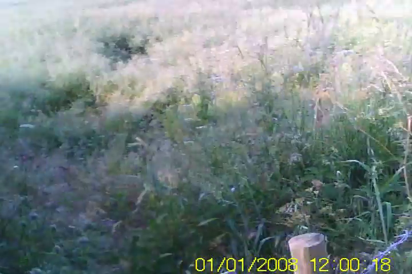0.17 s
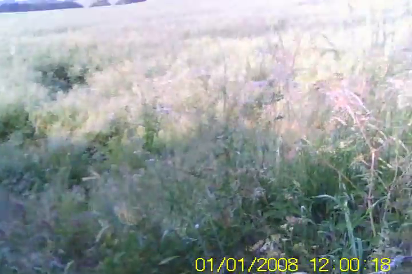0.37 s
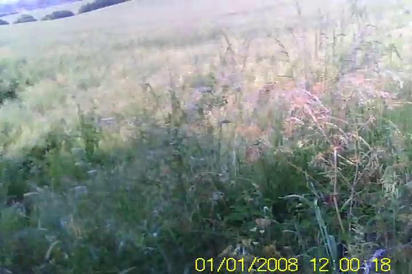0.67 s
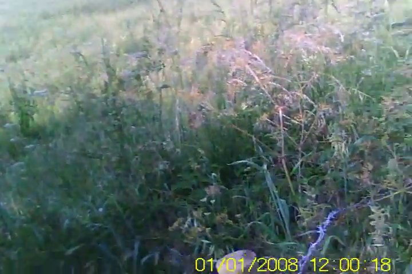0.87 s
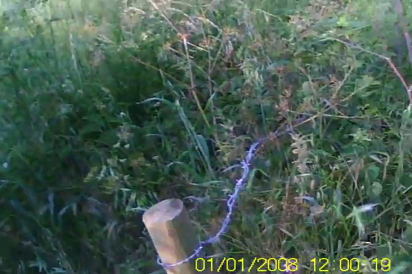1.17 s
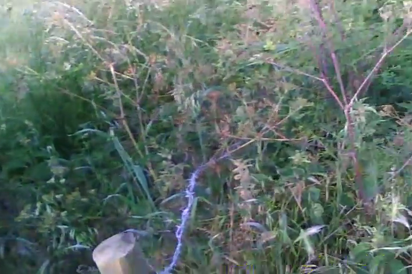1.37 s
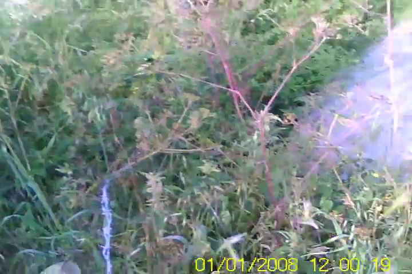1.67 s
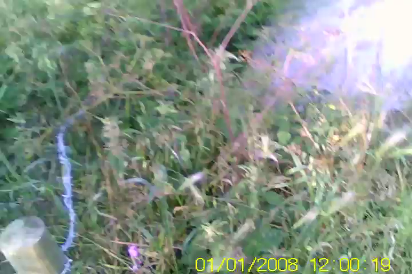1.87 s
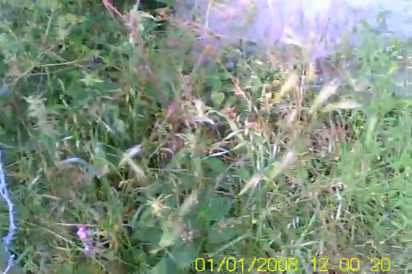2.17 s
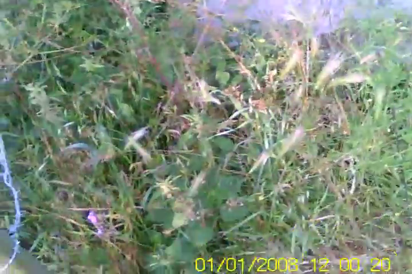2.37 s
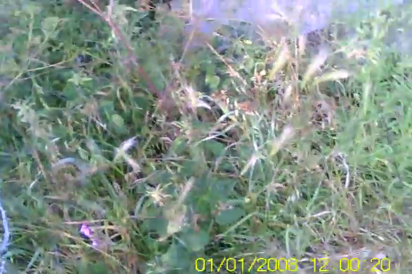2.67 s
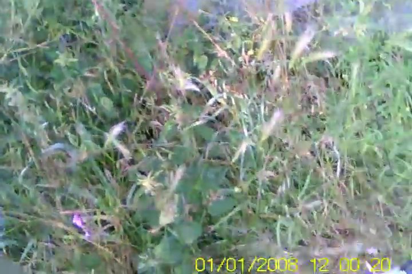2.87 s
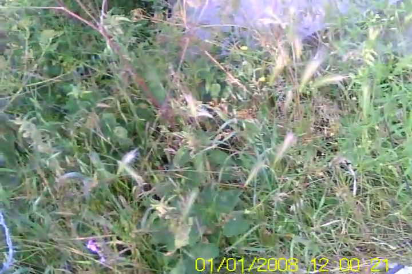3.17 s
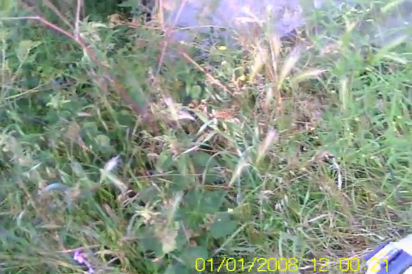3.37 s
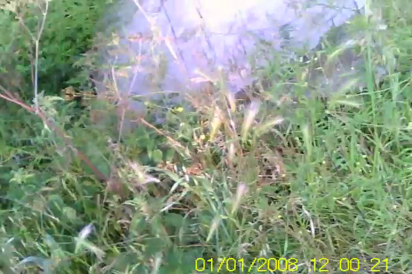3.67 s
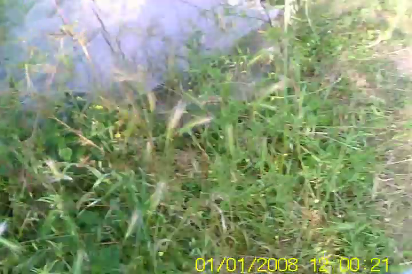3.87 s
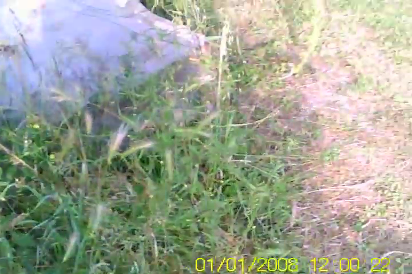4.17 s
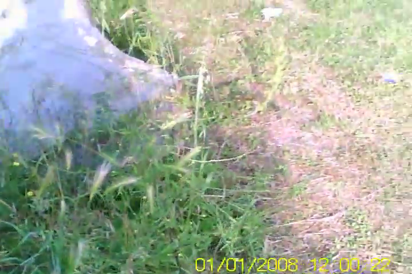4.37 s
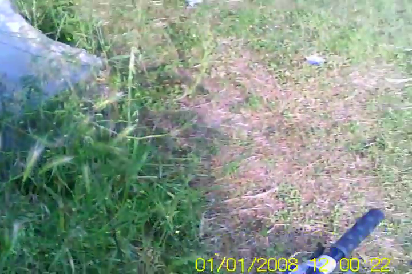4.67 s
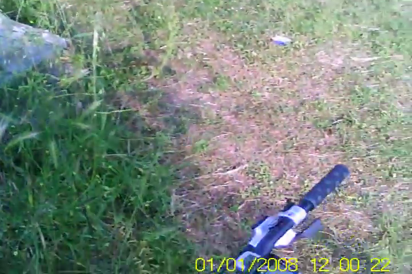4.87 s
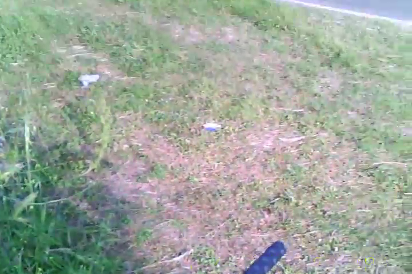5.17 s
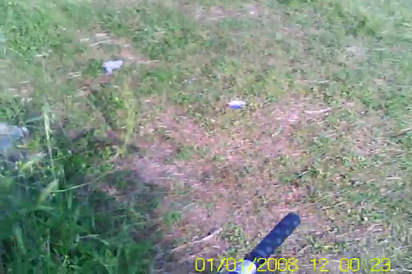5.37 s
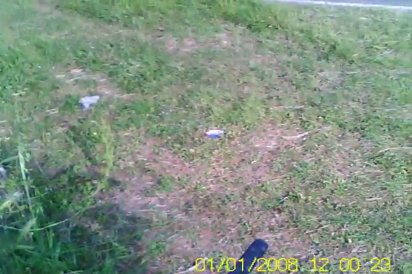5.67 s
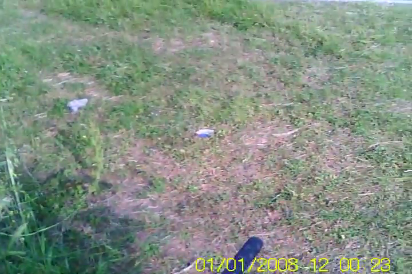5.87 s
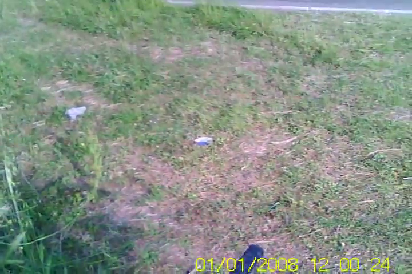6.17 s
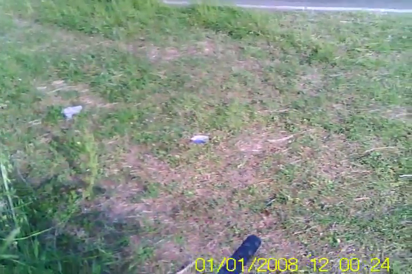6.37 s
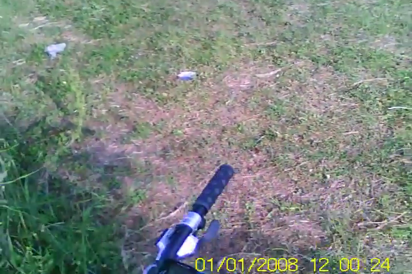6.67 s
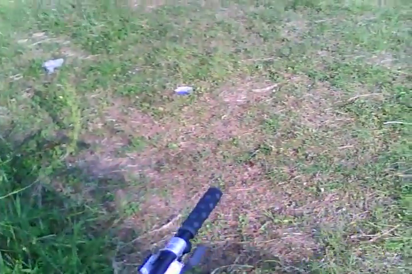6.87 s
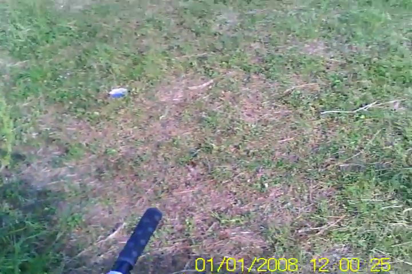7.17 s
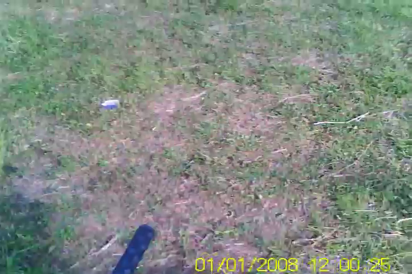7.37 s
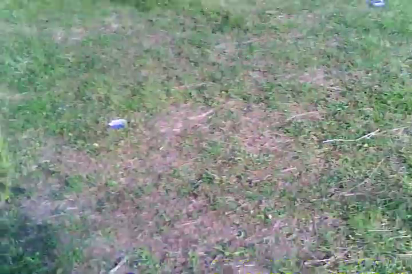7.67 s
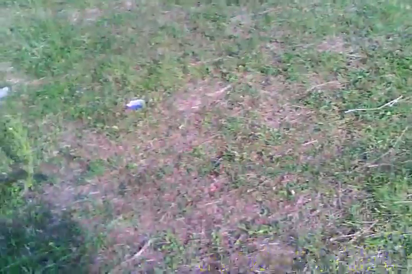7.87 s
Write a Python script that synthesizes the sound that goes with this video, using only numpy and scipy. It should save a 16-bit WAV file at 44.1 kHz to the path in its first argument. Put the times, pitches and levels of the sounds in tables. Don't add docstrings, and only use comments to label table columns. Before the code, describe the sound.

Sharp snaps and soft taps of stems on a bike, steady rustling, a continuous fluttering low rumble, and distant birds chirping outdoors.

```python
import sys
import numpy as np
from scipy import signal
from scipy.io import wavfile
from scipy.ndimage import uniform_filter1d

SR = 44100
rng = np.random.default_rng(int(sys.argv[2]) if len(sys.argv) > 2 else 0)


def output_pcm(signal):
    pcm = np.clip(np.atleast_2d(signal).T, -1, 1) * 32767
    wavfile.write(sys.argv[1], SR, np.round(pcm).astype(np.int16))


def boost_factor(decibels):
    exponent = np.asarray(decibels, float) / 20
    return 10 ** exponent


N = 354167

# frequency [Hz], level [dB].
HISS_SPECTRUM = [(88, -39), (150, -4), (198, -7), (251, -9.5), (349, -11.5), (573, -21.5), (652, -16.5),
                 (741, -21), (1660, -31), (2110, -28), (9350, -32.5), (10400, -35.5), (12100, -47),
                 (15700, -86), (22000, -120)]
# frequency [Hz], level [dB].
CLOCK_LINES = [(3892, -81), (5599, -82.5), (6202, -96.5), (7402, -86), (8301, -98), (9598, -87)]
# time [s], level [dB], frequency [Hz].
FALLING_NOTES = [(0.0907, -54.5, 3320), (0.1979, -64, 3090), (0.301, -59, 3250), (2.4603, -59, 3250),
                 (2.5681, -63, 3230), (2.6643, -61, 3280), (2.769, -60, 3300), (2.8818, -62, 3170),
                 (2.9916, -63, 3300), (3.106, -60.5, 3250), (3.2161, -62, 3010), (4.8908, -57, 3210),
                 (4.9876, -57.5, 3200), (5.0966, -56, 3260), (5.2051, -55, 3220), (5.3073, -57, 3220),
                 (5.416, -57.5, 3140), (7.2789, -55, 3300), (7.3806, -55, 3230), (7.4809, -55, 3050),
                 (7.5915, -56, 3210), (7.697, -57, 3070), (7.8191, -60, 3180)]
# time [s], level [dB], frequency [Hz].
RISING_NOTES = [(2.5406, -69, 4370), (2.6494, -70, 4370), (2.9627, -66, 4210), (3.0714, -67, 4210),
                (3.1994, -66, 4240), (4.8638, -68, 4360), (4.75, -64, 4250), (4.9694, -69, 4270),
                (5.0694, -66, 4320), (5.2819, -65, 4180), (5.3867, -67, 4330), (7.8032, -67, 4480)]
# time [s], level [dB], frequency [Hz].
LEVEL_NOTES = [(3.3794, -67, 4730), (3.5894, -68, 4760), (3.7419, -65, 5030), (3.8894, -66, 5010),
               (4.0911, -64, 5000), (4.2602, -63, 5000)]
# start [s], length [s], starting frequency [Hz], level [dB].
SLURS = [(1.15, .24, 3227, -63), (2.056, 0.22, 3280, -62), (4.536, .235, 3220, -66.5),
         (6.788, 0.21, 3180, -66)]
# start [s], length [s], from [Hz], to [Hz], level [dB].
GLIDES = [(.243, 0.019, 6520, 5140, -56), (.345, .027, 4050, 3880, -67), (.39, .045, 5400, 5300, -70),
          (.435, .095, 5130, 4650, -70), (.57, .05, 5520, 5330, -70), (.63, .068, 3400, 3730, -62),
          (.698, .012, 3650, 3250, -62), (.71, 0.037, 3300, 3600, -61), (.925, 0.029, 3550, 2600, -65),
          (.878, .022, 8400, 8500, -65), (.968, .014, 2600, 2850, -63), (1.04, .02, 3300, 3700, -61),
          (1.06, .014, 3620, 3400, -63), (1.078, .014, 3280, 3500, -60), (1.93, .07, 2720, 2750, -72),
          (2.17, .16, 1850, 1793, -69), (6.638, 0.025, 6350, 4920, -56), (6.732, .03, 4300, 3800, -60.5),
          (7.025, 0.07, 3330, 3750, -59.5), (7.09, .028, 3750, 3020, -59.5),
          (7.175, 0.082, 2120, 1980, -66.5), (6.925, .075, 1670, 1660, -67), (7.38, .045, 1700, 1690, -70),
          (7.175, .04, 3300, 3100, -68), (1.11, .03, 3550, 3480, -67), (6.87, .06, 4750, 4200, -70),
          (.755, 0.027, 3700, 3600, -66), (.79, .03, 3400, 3900, -71)]
# start [s], length [s], from [Hz], to [Hz], level [dB].
TRILLS = [(.175, 0.063, 5600, 6500, -61.5), (.435, 0.037, 5950, 6150, -63), (.7, .08, 3200, 3000, -70),
          (.915, 0.08, 3400, 3370, -66), (1.095, 0.063, 3180, 3250, -62.5),
          (6.53, 0.094, 4080, 6400, -64.5), (6.665, 0.067, 5900, 5620, -69), (6.82, 0.048, 6300, 5500, -66),
          (6.855, .075, 4950, 4250, -67), (6.925, .085, 4250, 3950, -67), (7.118, .057, 3450, 3750, -65)]
# frequency [Hz], width [Hz], level [dB].
REGULATOR_MODES = [(60, 38, -8), (122, 14, 6.5), (194.6, 22.5, 7.5)]
# time [s], level [dB].
PUSH_EFFORT = [(0.0, -61), (0.18, -59.5), (0.51, -62), (0.85, -59), (1.25, -63), (1.61, -59.5), (2.06, -59),
               (2.7, -59.5), (2.97, -63.5), (3.69, -60), (4.3, -64), (4.7, -57.5), (5.03, -63), (6.11, -64),
               (6.66, -57), (6.98, -62.5), (7.45, -59.5), (8.03, -66)]
# frequency [Hz], level [dB].
BRUSH_SPECTRUM = [(250, -16), (500, -3), (1000, -1.5), (1600, -2), (2000, -7.5), (2600, -14), (4000, -16),
                  (8000, -25)]
# middle [s], length [s], body [dB], swish [dB].
STROKES = [(0.166, 0.11, -60, -73), (0.76, 0.18, -60.5, -83), (1.514, 0.077, -56, -75),
           (1.86, 0.22, -59, -87), (2.25, 0.16, -71, -83), (2.744, 0.045, -45.5, -61),
           (2.783, 0.05, -60, -82), (3.74, 0.12, -59, -78), (4.637, 0.14, -63, -65),
           (4.738, 0.19, -56.5, -62), (4.988, 0.21, -63, -83), (6.464, 0.049, -53, -73),
           (6.617, 0.23, -65, -83), (6.898, 0.33, -62, -81), (7.53, .2, -69, -89)]
# frequency [Hz], level [dB].
STROKE_SPECTRUM = [(250, -30), (500, -1), (1000, -3.5), (1600, 1.5), (2000, -5.5), (2600, -8),
                   (4000, -14.5), (8000, -54)]
# frequency [Hz], width [Hz], level [dB].
SWISH_MODES = [(8300, 1000, 0.5), (6300, 790, -7), (9800, 830, -12), (3400, 880, -4)]
# frequency [Hz], width [Hz], level [dB].
SNAP_MODES = [
    (1600, 600, 3),
    (1050, 500, -14),
    (2350, 600, -10),
    (3200, 700, -10),
    (4400, 1200, -17),
]
# frequency [Hz], width [Hz], level [dB].
PORT_MODES = [(6300, 460, 1.5), (8400, 1100, 4), (9800, 900, -12), (4470, 680, -6)]
# frequency [Hz], width [Hz], level [dB].
TUBE_MODES = [(360, 68, -7), (477, 73, -3), (600, 110, -3), (760, 100, -7.5), (884, 60, -1.5),
              (1150, 47, -18)]
# time [s], snap [dB], tube frequency [Hz], knock [dB], airy tick [dB].
BLOWS = [(0.7097, -40, 506, -48, -53), (0.7247, -46, 447, -56, -52), (0.7433, -39.5, 778, -46, -34.5),
         (0.7842, -34.5, 441, -47, -43.5), (1.4707, -33, 760, -33, -57), (1.4962, -38, 730, -31, -46),
         (1.508, -30, 690, -40, -27), (1.5149, -35, 1180, -38, -41), (1.5681, -34, 528, -44, -60),
         (2.0919, -32, 490, -38, -52), (2.1044, -49, 1000, -36.5, -63), (2.7349, -53, 541, -33.5, -45),
         (2.7413, -33.5, 610, -40, -40.5), (2.751, -41, 470, -33.5, -46), (2.7594, -50, 522, -40, -50),
         (3.3544, -32.5, 398, -46, -47), (3.6403, -36, 500, -37, -42), (3.7898, -59, 404, -54, -44)]
# time [s], snap [dB], snap frequency [Hz], knock [dB].
TAPS = [(0.841, -51, 1660, -44), (0.9505, -44, 1590, -51), (1.5457, -29, 1525, -41),
        (1.8617, -58, 1600, -44.5), (1.9799, -52, 1450, -42.5), (2.7255, -44, 1850, -52),
        (2.848, -46, 1390, -38), (2.86, -52, 2300, -40), (2.8815, -45, 1800, -45), (3.4433, -43, 1660, -50),
        (3.7149, -50, 1350, -50), (4.0168, -42, 1630, -45), (4.4115, -37, 1590, -45),
        (4.8355, -37, 1670, -37), (4.9096, -45, 1400, -50), (5.1104, -53, 1500, -60),
        (6.4507, -43, 1600, -48), (6.4631, -45, 1830, -48), (7.4993, -60, 1400, -37.5),
        (7.7328, -46, 1340, -59), (3.557, -49, 1600, -60), (3.6345, -46, 1150, -58),
        (3.7205, -48, 1550, -56), (4.607, -50, 1500, -58), (4.637, -49, 1650, -60), (2.765, -46, 1400, -52),
        (1.5735, -43, 1400, -48)]
# time [s], level [dB], frequency [Hz], width [Hz].
IMPACT_RINGS = [(1.471, -19.5, 194.4, 21.6), (1.471, -17.5, 950, 75), (1.495, -22, 190, 29),
                (1.4955, -22.5, 388, 55), (1.4711, -21.5, 467, 85), (2.091, -30.5, 228, 41),
                (2.846, -31, 132, 5.7), (2.848, -34, 230, 28), (2.862, -36.5, 605, 47),
                (2.862, -36, 530, 36), (2.866, -35.5, 242, 17), (2.868, -40.5, 130, 5.8),
                (2.868, -38.5, 450, 13.6), (2.863, -45, 1700, 64), (2.734, -35, 510, 32),
                (2.735, -33.5, 1370, 91), (3.6408, -20.5, 890, 170), (3.642, -31, 1700, 120),
                (3.646, -29, 530, 50), (3.715, -32, 242, 47), (7.499, -29, 228, 38), (7.499, -35.5, 486, 60),
                (0.841, -37, 990, 150), (1.9, -36, 1740, 120), (2.742, -36.5, 830, 60),
                (1.509, -32, 2940, 200), (6.45, -46, 1830, 120), (4.836, -36, 2030, 200),
                (4.91, -46, 960, 230), (1.497, -27, 1050, 89),
                (.7097, -43, 1330, 130), (.7433, -45, 813, 90), (.7842, -46, 1114, 150),
              (1.471, -29.5, 1560, 89), (1.496, -32, 1513, 100), (1.496, -26, 597, 66),
              (1.508, -32, 1176, 42), (1.512, -38, 1420, 60), (1.513, -33, 1810, 60),
              (1.569, -32, 1950, 250), (1.5685, -34, 1270, 200), (1.5685, -34, 528, 140),
              (1.98, -41, 1066, 130), (2.092, -32.5, 720, 120), (2.741, -33, 1846, 96),
              (2.751, -40, 1421, 70), (2.751, -42, 495, 50), (2.848, -40, 603, 150), (2.89, -44, 460, 20),
              (3.6401, -23, 415, 110), (2.0915, -33, 490, 85), (2.104, -42, 1000, 90),
              (2.092, -33, 1000, 200), (2.731, -42, 700, 150), (4.836, -42, 1270, 200),
              (7.499, -41, 985, 120)]


def evened(x):
    return x / np.sqrt(np.mean(x ** 2) + 1e-20)


def add(mix, s, sound):
    part = mix[round(s * SR):][:len(sound)]
    part += sound[:len(part)]


def smooth(x, seconds):
    r = np.exp(-1 / (seconds * SR))
    return signal.lfilter([1 - r], [1, -r], x)


def band(x, lo_hz, hi_hz):
    return signal.sosfilt(signal.butter(3, [lo_hz, hi_hz], "bandpass", fs=SR, output="sos"), x)


def ring(x, modes):
    out = np.zeros(x.shape)
    for hz, width, db in modes:
        r = np.exp(-np.pi * width / SR)
        pole = r * np.exp(2j * np.pi * hz / SR)
        out += boost_factor(db) * signal.lfilter([1 - r], [1, -pole], x).real
    return out


def noise(spectrum, patchy_db):
    bin_hz = np.fft.rfftfreq(512, 1 / SR)
    real, imag, patches = rng.standard_normal((N // 128 + 5, 257, 3)).T
    patches = uniform_filter1d(patches, 6, 0)
    patches = evened(uniform_filter1d(patches, 12, 1))
    hz, db = np.transpose(spectrum)
    shape_db = np.interp(np.log(bin_hz + 1), np.log(hz), db)
    spectra = (real + 1j * imag) * boost_factor(shape_db[:, None] + patchy_db * patches)
    return evened(signal.istft(spectra, nperseg=512, noverlap=384)[1][:N])


def amplifier():
    t = np.arange(N) / SR
    wander = smooth(smooth(rng.standard_normal(N), 0.052), 0.017)
    drift = 0.12 * evened(wander)
    lines = np.zeros(N)
    for hz, db in CLOCK_LINES:
        turns = hz * t + drift * hz / 4000 + rng.random()
        lines += boost_factor(db) * np.sqrt(2) * np.sin(2 * np.pi * turns)
    return boost_factor(-56) * noise(HISS_SPECTRUM, 1.0) + lines


def tone(hz, db, taper):
    waver, flutter = (evened(smooth(smooth(z, 0.0025), 0.0019)) for z in rng.standard_normal((2, len(hz))))
    phase = 2 * np.pi * np.cumsum(hz * (1 + 0.0066 * waver)) / SR
    level = boost_factor(db + 1.8 * flutter) * np.sqrt(2)
    return level * np.sin(phase) * signal.windows.tukey(len(hz), taper)


def birds():
    far, near = np.zeros((2, N))
    warble_hz = 88
    dips = 0.6 - 2 * np.sin(np.pi * warble_hz * np.arange(SR) / SR) ** 4

    for s, length, hz, db in SLURS:
        u = np.linspace(0, 1, round(length * SR))
        rise = 0.24 * np.sin(np.pi / 2 * u) ** 1.05
        warble = 0.055 * u ** 0.58 * dips[:len(u)]
        add(far, s, tone(hz * (1 + rise + warble), db - 8 * u, 0.21))

    for rows, depth in ((GLIDES, 0), (TRILLS, 0.0347)):
        for s, length, from_hz, to_hz, db in rows:
            u = np.linspace(0, 1, round(length * SR))
            hz = from_hz + (to_hz - from_hz) * u
            hz = hz + depth * 3300 * (hz / 3300) ** 2.2 * dips[:len(u)]
            arch_db = 7.5 * (2 * u - 1) ** 2
            add(far, s, tone(hz, db - arch_db, 0.15))

    # notes, note length in s, relative glide, trim in dB
    callers = ((FALLING_NOTES, 0.022, -0.14, -6), (RISING_NOTES, 0.022, 0.08, -5),
               (LEVEL_NOTES, 0.045, -0.015, -6))
    for notes, length, glide, trim_db in callers:
        u = np.linspace(0, 1, round(length * SR))
        hook = 0.054 * np.exp(-u / 0.14)
        tune = 1 + glide * (u ** 2.27 - 0.2) - hook
        for s, db, hz in notes:
            add(near, s - 0.004, tone(hz * tune, db + trim_db, 0.51))

    echoes = rng.standard_normal(8000) * np.exp(-np.arange(8000) / SR / 0.084)
    echoes /= np.linalg.norm(echoes)
    scattered = signal.oaconvolve(boost_factor(-3.5) * far + boost_factor(-8) * near, echoes)[:N]
    return far + near + scattered


def throb():
    busy_s, idle_s, stall_s, let_up_s = 0.014, 0.021, 0.031, 0.0034
    jitter, draw = rng.standard_normal((300, 4)), rng.random(300)
    filled = np.floor(np.cumsum(0.25 * (0.5 + draw)))
    load, s = np.zeros(N + SR), 0.0
    for j, stalled in zip(jitter, np.diff(filled, prepend=0) > 0):
        sag_s = (stall_s if stalled else busy_s) * (1 + 0.142 * j[0])
        add(load, s, np.full(round(sag_s * SR), 1 + 0.18 * j[1]))
        if stalled:
            add(load, s + sag_s * (0.4605 + 0.094 * j[3]), -np.ones(round(let_up_s * SR)))
        s = min(s + sag_s + idle_s * (1 + 0.17 * j[2]), N / SR)

    frames = np.arange(N) / SR * 30.02
    sensor_read = 1.0 * (frames % 1 < 0.05)
    quarter_frame = 0.21 * (4 * frames % 1 < 0.2)
    let_ups = 0.31 * (sensor_read + quarter_frame)
    supply = smooth(smooth(let_ups - load[:N] + 0.89, 0.0051), 0.00064)
    coupled = supply - smooth(supply, 0.025) + ring(supply, REGULATOR_MODES)
    return boost_factor(-31.5) * evened(coupled - coupled.mean())


def brush():
    push_db = np.interp(np.arange(N) / SR, *np.transpose(PUSH_EFFORT))
    body, sweep = boost_factor(push_db - 2), np.zeros(N)
    swish = boost_factor(-75 + 0.5 * (push_db + 60.5))
    for middle, length, stroke_db, swish_db in STROKES:
        stroke = np.hanning(round(1.26 * length * SR))
        add(sweep, middle - 0.63 * length, boost_factor(stroke_db) * stroke)
        add(swish, middle - 0.73 * length, boost_factor(swish_db) * stroke)

    crack_level = boost_factor(6.1 * np.minimum(rng.exponential(1, N), 3.8))
    cracks = crack_level * (rng.random(N) < 250 / SR)
    grain = evened(1 + 0.15 * evened(smooth(cracks, 0.0047)))
    leaves = evened(band(ring(rng.standard_normal(N), SWISH_MODES), 2100, 10200))
    stems = body * noise(BRUSH_SPECTRUM, 1.6) + sweep * noise(STROKE_SPECTRUM, 1.5)
    return grain * (stems + swish * leaves)


def hits():
    out, t = np.zeros(N), np.arange(2600) / SR
    tap_tubes = 460 * (1 + 0.19 * rng.uniform(-1.1, 1, len(TAPS)))
    soft = [(s, snap, hz, knock, -66) for (s, snap, _, knock), hz in zip(TAPS, tap_tubes)]
    s, snap_db, tube_hz, knock_db, tick_db = np.transpose(BLOWS + soft)
    stem_hz, stem_width, stem_db = SNAP_MODES[0]
    pitches = [1] * len(BLOWS) + [row[2] / stem_hz for row in TAPS]

    excess_db = np.maximum(np.maximum(knock_db + 45, tick_db + 47), 0)
    rattle_ms = np.maximum(1.9 + 0.27 * excess_db, 0.3)[:, None]
    decay = np.exp(-t * 1000 / rattle_ms) + 0.046 * np.exp(-t / 0.011)
    rattle = (1 - np.exp(-t / 0.0003)) * decay
    z = rng.standard_normal((len(s), 3, 2600))

    crack = -np.exp(-t / 0.0001) + 0.3 * z[:, 0] * rattle
    stems = []
    for c, pitch in zip(crack, pitches):
        mode = [(stem_hz * pitch, stem_width, stem_db)]
        stems.append(ring(ring(c, mode), mode))
    snaps = band(ring(crack, SNAP_MODES[1:]) + stems, 860, 4800)

    push = -np.exp(-t / 0.0002) + 0.32 * z[:, 1] * rattle
    struck_tube = np.array([ring(p, [(hz, 90, 3)]) for p, hz in zip(push, tube_hz)])
    knocks = band(ring(push, TUBE_MODES) + struck_tube, 225, 1570)

    puff = z[:, 2] * (rattle + 2.1 * np.exp(-t / 0.0008))
    ticks = band(ring(puff, PORT_MODES), 3900, 9600)

    for db, sounds in ((snap_db, snaps), (knock_db, knocks), (tick_db, ticks)):
        peaks = abs(sounds).max(axis=1, keepdims=True)
        for at, sound in zip(s, boost_factor(db)[:, None] * sounds / peaks):
            add(out, at, sound)

    t = np.arange(6000) / SR
    for at, db, hz, width in IMPACT_RINGS:
        envelope = (1 - np.exp(-t * hz / 0.42)) * np.exp(-np.pi * width * t)
        add(out, at, -boost_factor(db) * envelope * np.sin(2 * np.pi * hz * t))
    return out


def scene():
    return (amplifier() + birds() + throb() + brush() + hits())[None]


def band_limit(x):
    return signal.sosfilt(signal.butter(12, 12240, fs=SR, output="sos"), x)


def record(dry):
    edge = signal.butter(8, 10900, fs=SR, output="sos")
    mix = signal.sosfilt(edge, dry) - 0.0069
    return band_limit(mix)


dry = scene()
out = record(dry)
output_pcm(out)
```